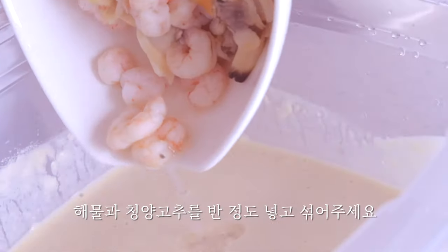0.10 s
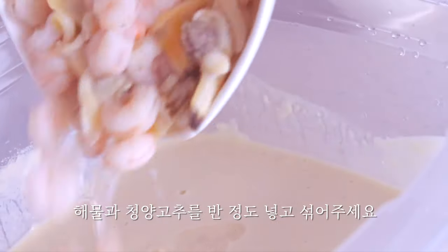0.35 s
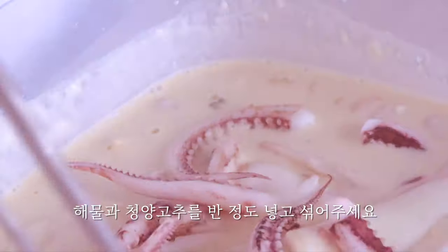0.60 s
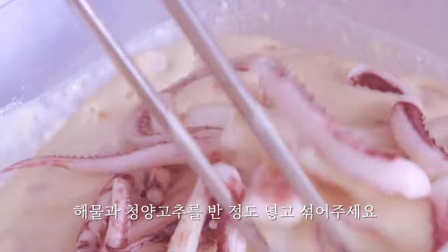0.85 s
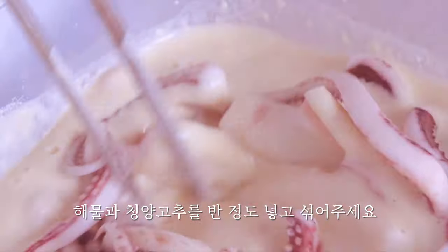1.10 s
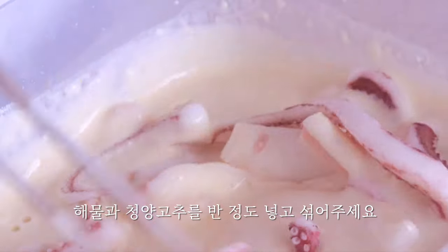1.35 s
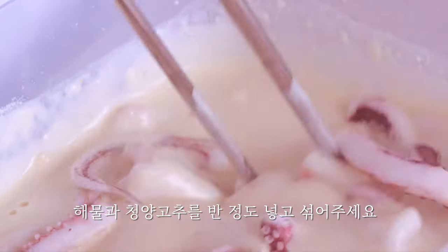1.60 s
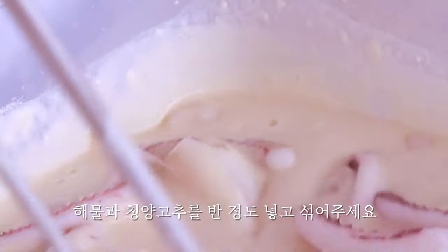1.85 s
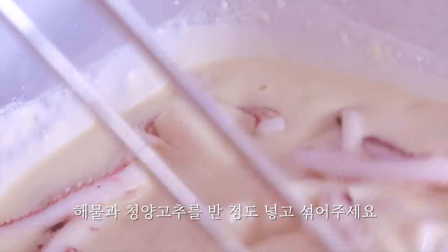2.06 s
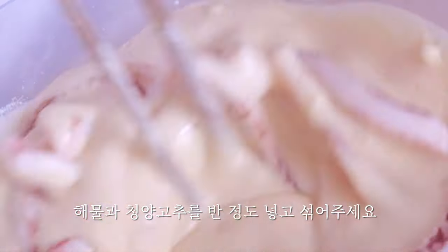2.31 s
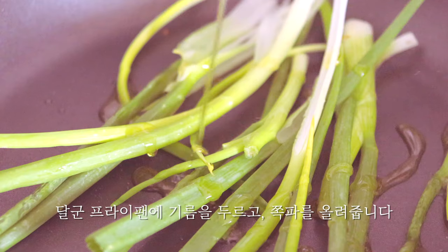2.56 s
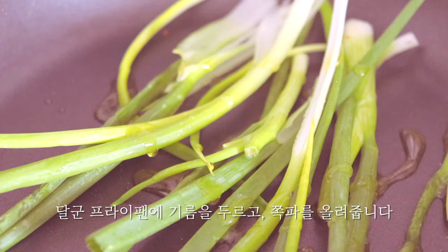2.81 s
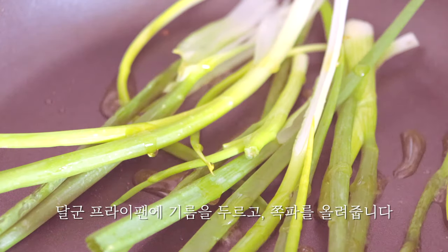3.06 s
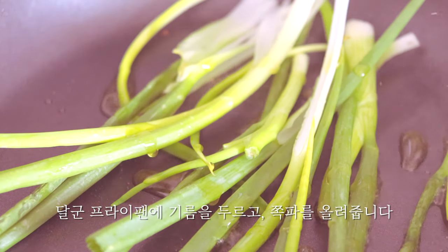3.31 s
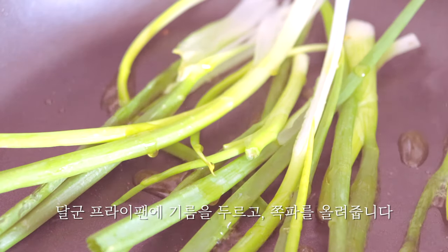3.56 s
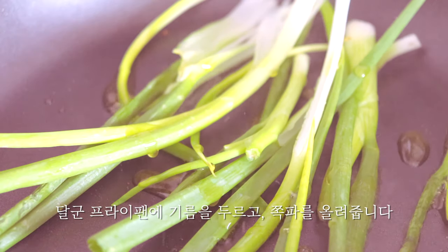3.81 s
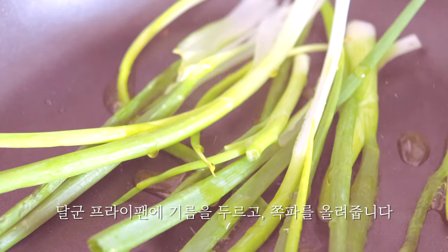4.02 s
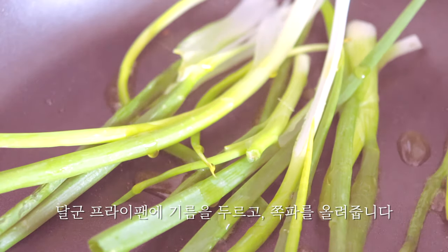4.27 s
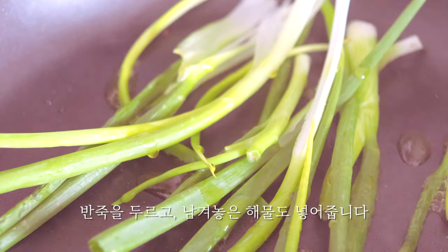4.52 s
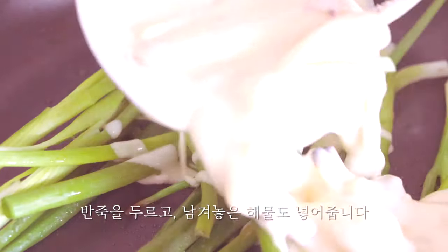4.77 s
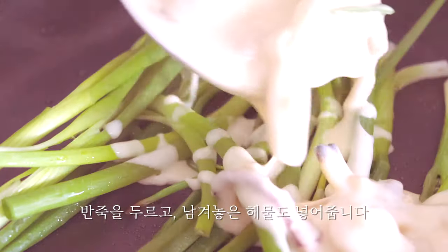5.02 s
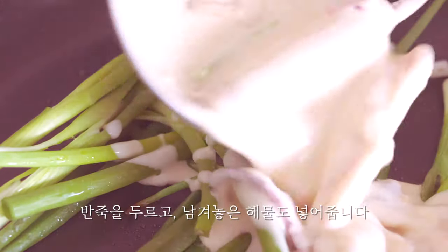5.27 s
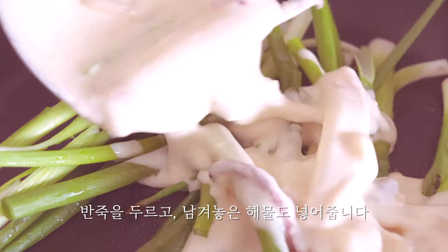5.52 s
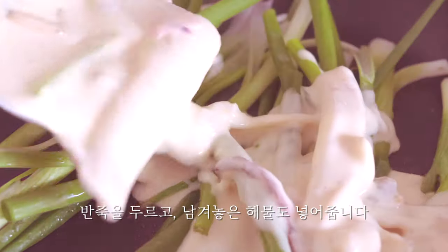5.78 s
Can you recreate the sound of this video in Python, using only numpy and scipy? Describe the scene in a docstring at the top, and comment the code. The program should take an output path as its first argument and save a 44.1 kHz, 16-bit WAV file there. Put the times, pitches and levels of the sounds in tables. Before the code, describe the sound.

The first half second is almost silent: soft room air and a couple of tiny wet ticks. At about 0.56 s a low, distant appliance rumble takes over. Metal utensils knock a batter bowl at 0.96 s, a short hollow clunk with a small room echo. Around 1.65 s a quick clatter strikes rim and dish, leaving a clear ring that is damped by 2.1 s, when a small click and soft counter thud follow. Faint wet batter ticks come at 2.2-2.4 s. At 2.6 s it cuts to close, bright oil sizzle, fluctuating and crackling, with sharp spits and droplets snapping against the microphone, mainly left; a strong burst lands at 3.09 s, others at 3.83 and 4.25 s. From 4.84 s batter covers the oil: the hiss becomes louder and steadier, with less rumble after 5 s, faint steam squeaks near 5 s and heavy pops around 5.16-5.4 s, sizzling to the end at about 5.9 s.

```python
"""A kitchen, starting in a quiet room with a few wet ticks; then the scene changes to steel tongs knocking a
bowl of batter over a low appliance rumble, and then to oil sizzling close up in a pan. Room and oil are shaped
noise; knocks are short blows with echoes and decaying modes. Spits are noise bursts; droplets strike the
microphone, mostly its left side, as snaps of pressure with a recoil. Later the pan sounds change: more hiss,
less rumble, thinner droplets."""
import sys
import numpy as np
from scipy import signal
from scipy.fft import rfft, irfft, next_fast_len
from scipy.io import wavfile
from scipy.ndimage import uniform_filter1d

SR = 44100
rng = np.random.default_rng(int(sys.argv[2]) if len(sys.argv) > 2 else 0)


def boost_factor(decibels):
    """Convert a level in decibels to a linear amplitude factor."""
    exponent = np.asarray(decibels, float) / 20
    return 10 ** exponent


def generate_wav(signal):
    """Clip the signal to [-1, 1] and save it as 16-bit WAV at the path in sys.argv[1]."""
    frames = np.transpose(np.atleast_2d(signal))
    scaled = np.clip(frames, -1, 1) * 32767
    pcm = np.round(scaled).astype(np.int16)
    wavfile.write(sys.argv[1], SR, pcm)


N = 259308  # length (samples)
STIR_S, FRY_S = 0.5585, 2.601  # the scene changes to the stirring, then to the frying (s)
COVERED_S = 4.84  # batter covers the oil and the hiss turns steady (s)
LATE_S = 5  # the pan sounds change: more hiss, less rumble, thinner droplets (s)


def paint(x, shape):
    """Filter by (hz, db) points, joined on a logarithmic frequency axis."""
    hz, db = np.transpose(shape)
    size = next_fast_len(x.shape[-1])
    f = np.arange(size // 2 + 1) * SR / size + 1  # 1 Hz up, to avoid log 0
    gain = boost_factor(np.interp(np.log(f), np.log(hz), db))
    return irfft(rfft(x, size) * gain, size)[..., :x.shape[-1]]


def level(x, db):
    """Scale to an rms level in dB of full scale."""
    return x * boost_factor(db) / np.sqrt(np.mean(x ** 2))


def band(x, lo_hz, hi_hz, order=2):
    """Causal band-pass."""
    sos = signal.butter(order, [lo_hz, min(hi_hz, 0.45 * SR)], "band", fs=SR, output="sos")
    return signal.sosfilt(sos, x)


def high_pass(x, cut_hz, order=2):
    """Causal high-pass."""
    return signal.sosfilt(signal.butter(order, cut_hz, "high", fs=SR, output="sos"), x)


def pan(db):
    """Left and right gains for a left minus right difference in dB."""
    return boost_factor(np.array([[db], [-db]]) / 2)


def walk(rate):
    """Random levels held 1 / rate s and slewed; spread near 1."""
    hold = int(SR / rate)
    steps = np.repeat(rng.standard_normal(N // hold + 1), hold)
    return 1.43 * uniform_filter1d(steps, hold)[:N]


def wide(noise, alike_hz):
    """Two sides made the same in the bass and unlike in the treble."""
    side = high_pass(noise[1], alike_hz)
    return noise[0] + side * np.array([[1], [-1]])


def add(out, s, sound):
    """Mix a sound in at a time."""
    i = int(s * SR)
    out[:, i:i + sound.shape[1]] += sound[:, :max(N - i, 0)]


# spectrum of the quiet room: pitch_hz, level_db (relative, per Hz)
QUIET_SHAPE = [(18, -44), (30, -15), (233, 0.5), (822, -11.5), (962, -14.5), (1160, -11), (1760, -23),
               (12600, -36), (16000, -38)]
# spectrum of the low appliance rumble: pitch_hz, level_db (relative, per Hz)
RUMBLE_SHAPE = [(18, -51), (30, -22.5), (189, -3), (355, -6.5), (394, -6.5), (801, -16.5), (913, -16),
                (1070, -17.5), (2230, -28), (5590, -35), (16000, -43)]
QUIET_DB, RUMBLE_DB = -75.5, -63  # rms before the flicker (dB of full scale)
ROOM_ALIKE_HZ = 945  # left and right agree below about this


def room_tone(shape, db, flicker_db):
    """Distant appliances and room air: shaped stereo noise, a little unsteady in level."""
    air = paint(wide(rng.standard_normal((2, N)), ROOM_ALIKE_HZ), shape)
    return level(air, db) * boost_factor(flicker_db * walk(11.62))


# reverberation of the kitchen: pitch_hz, t60_s
ROOM_T60 = [(150, 0.43), (500, 0.3), (1400, 0.35), (3000, 0.22), (6000, 0.043), (12000, 0.48)]


def kitchen(patchy_db=4):
    """Echo tail from one spot: half-octave bands of noise dying unevenly at their own rates."""
    t = np.arange(SR // 3) / SR
    knots = t[::SR // 60]
    hz, t60 = np.transpose(ROOM_T60)
    tail = 0
    for f in 60 * 2 ** np.arange(0, 8.5, 0.5):
        noise = band(wide(rng.standard_normal((2, len(t))), 1000), f / 2 ** 0.14, f * 2 ** 0.32, order=1)
        patchy = patchy_db * np.interp(t, knots, rng.standard_normal(len(knots)))
        decay = 60 * t / np.interp(np.log(f), np.log(hz), t60)
        tail = tail + noise * boost_factor(patchy - decay)
    # the counter and nearby things answer first and strongest
    return tail * np.clip(t / 0.001, 0, 1) * (1 + 1.83 * np.exp(-t / 0.0047))


# tongs and dishes knocked: start_s, peak_db, lowest_hz, highest_hz, left_minus_right_db
KNOCK_LIST = [(0.956, -15.5, 350, 2120, -4.5), (1.645, -38, 500, 1410, -7), (1.6483, -26, 593, 1520, 5),
              (1.6535, -18, 450, 2830, -7), (1.8103, -36.5, 467, 1830, -6), (2.1194, -34, 1200, 5150, -5),
              (2.124, -37, 149, 1100, 4)]
# wet ticks of batter and drips: start_s, peak_db, centre_hz, left_minus_right_db
TICK_LIST = [(.2064, -69, 5750, 1), (0.2424, -59, 4300, -3), (0.5281, -52.5, 3500, -3),
             (0.7226, -57, 4500, 0), (1.4651, -58, 4200, -4), (2.2165, -58, 6800, 0),
             (2.2726, -47, 2140, 2.5), (2.416, -45.5, 3050, 1)]
TICK_SPAN = 2  # a tick's band edges lie this factor below and above its centre
KNOCK_ECHO_DB, TICK_ECHO_DB = -29.5, -35.5  # gain of the echo tail (dB)


def knocks():
    """Each contact is a band-limited blow heard direct and through the kitchen's echo."""
    out = np.zeros((2, N))
    click = np.eye(1, 2000)[0]
    tick_tail = kitchen()  # the ticks all come from one spot
    contacts = [(*row, KNOCK_ECHO_DB, kitchen()) for row in KNOCK_LIST]
    contacts += [(s, db, hz / TICK_SPAN, hz * TICK_SPAN, pan_db, TICK_ECHO_DB, tick_tail)
                 for s, db, hz, pan_db in TICK_LIST]
    for s, db, lo_hz, hi_hz, pan_db, echo_db, tail in contacts:
        # a soft contact falls off steeply in the treble, gently in the bass
        blow = band(click, lo_hz, 2 * hi_hz, order=1)
        blow = signal.sosfilt(signal.butter(4, hi_hz, fs=SR, output="sos"), blow)
        blow = blow[None] * boost_factor(db) / abs(blow).max()
        add(out, s, pan(pan_db) * blow)
        add(out, s, pan(pan_db / 2) * boost_factor(echo_db) * signal.fftconvolve(tail, blow, axes=1))
    return out


def ring(hit, modes, waver_db=2.5):
    """Decaying modes of a struck object until a touch damps it; echoes make each mode waver."""
    start, stop, hit_db, bloom_ms = hit
    t = np.arange(int((stop - start) * SR)) / SR
    knots = t[::SR // 40]
    phases = rng.uniform(-0.84, 0.8, (len(modes), 2, 1))  # each side hears its own phase
    tone = 0
    for (hz, db, t60), phase in zip(modes, phases):
        waver = waver_db * np.interp(t, knots, rng.standard_normal(len(knots)))
        wave = np.sin(2 * np.pi * hz * t + phase * min(hz / 900, 1.3))
        tone = tone + boost_factor(db + waver - 60 * t / t60) * wave
    bloom = np.clip(1000 * t / bloom_ms, 0, 1)  # a bloom below zero keeps the object silent
    damping = np.clip((stop - start - t) / 0.017, 0, 1)
    return boost_factor(hit_db) * tone * bloom * damping


# one blow on an object: start_s, damped_s, level_db, bloom_ms (the bowl's is below zero: silent)
BOWL_BLOW = (0.958, 1.5, -36, -0.5)
DISH_BLOW = (1.6542, 2.112, -36, 48)
DISH_TOP_BLOW = (1.653, 2.112, -36, 4)
RIM_BLOW = (1.6535, 2.1, -35.5, 0.5)
TIP_BLOW = (2.1195, 2.2, -30, .6)
# several blows, one per row: start_s, damped_s, level_db, bloom_ms
TONGS_BLOWS = [(0.954, 1.5, -60, 2), (1.65, 2.1, -61, 1.8)]
COUNTER_BLOWS = [(.958, 1.3, -46.5, 6.6), (1.656, 2.0, -45.5, 4.5), (2.122, 2.5, -43.5, 4.3),
                 (4.138, 4.29, -49, 8), (4.163, 4.29, -59, 10), (4.297, 4.5, -52, 8.7),
                 (4.325, 4.5, -54.5, 11)]
# modes of each object: pitch_hz, level_db (added to the blow's), t60_s
BOWL_MODES = [(360, -8, 0.39), (437, -6, 0.24), (551, -2.5, 0.15), (686, -7, 0.22), (768, -3, 0.28),
              (838, 5, 0.13), (914, -2, .22), (1195, -9, .2), (1435, -7, 0.3), (1610, -6, 0.26),
              (1670, -14, .55), (1930, -3, .1), (2202, -9, 0.19), (2960, -22, .17)]
DISH_MODES = [(1620, -14, .8), (1696, -1, .72)]
DISH_TOP_MODES = [(3187, -6, .52), (3408, -9, .44), (5570, -33, .3)]
RIM_MODES = [(356, -8.5, 0.33), (634, -11, 0.26), (844, -9, 0.27), (970, 5.5, 0.13), (1117, -10, .3),
             (1464, -3.5, .2), (1916, -4, 0.11), (2040, -5, 0.15), (2220, -7, .15), (2370, -3, 0.097)]
TIP_MODES = [(1500, -6, .02), (2120, -1, 0.013), (2850, 0, 0.012), (3600, -5, .009), (4500, -3, 0.008)]
TONGS_MODES = [(10300, -2.5, 0.15), (11780, -6, 0.16), (11800, -15, 0.25), (14400, -2.5, .12)]
COUNTER_MODES = [(69.6, -10, 0.11), (153.4, -3, 0.23), (192.7, -9, 0.28), (373, -1, 0.12), (813, -5.5, .08),
                 (934, -4, 0.084)]


def struck():
    """Tongs, dishes and counter set ringing: a sum of damped modes for every blow."""
    out = np.zeros((2, N))
    hits = [(BOWL_BLOW, BOWL_MODES), (DISH_BLOW, DISH_MODES), (DISH_TOP_BLOW, DISH_TOP_MODES),
            (RIM_BLOW, RIM_MODES), (TIP_BLOW, TIP_MODES)]
    hits += [(hit, TONGS_MODES) for hit in TONGS_BLOWS]
    hits += [(hit, COUNTER_MODES) for hit in COUNTER_BLOWS]
    for hit, modes in hits:
        add(out, hit[0], ring(hit, modes))
    return out


# steam squeezing out through a gap: start_s, lasts_s, from_hz, to_hz, level_db (before the chopping)
SQUEAL_LIST = [(2.692, .03, 2500, 1000, -47.5), (4.912, 0.028, 2500, 3200, -50),
               (4.998, .035, 3400, 3000, -53), (5.035, .11, 3100, 2850, -54)]


def squeals(wobble=0.02, chop_db=3, breath=0.75):
    """Faint breathy whistles that glide and waver, chopped as the bubbles pass."""
    out = np.zeros((2, N))
    for s, lasts, from_hz, to_hz, db in SQUEAL_LIST:
        part = np.arange(0, 1, 1 / (lasts * SR))
        count = len(part)
        hz = (from_hz + (to_hz - from_hz) * part) * (1 + wobble * walk(307)[:count])
        tone = np.sin(2 * np.pi * np.cumsum(hz) / SR) * np.sin(np.pi * part ** 0.67)
        sputter = walk(abs(from_hz - to_hz))[:count]  # a wider glide sputters faster
        tone = tone * (1 - breath + breath * sputter)
        add(out, s, np.ones((2, 1)) * tone * boost_factor(db + chop_db * walk(255)[:count]))
    return out


# how hard the oil boils: time_s, vigour_db
BOIL_CURVE = [(2.6, 2.5), (2.68, -2.5), (2.9, -0.5), (3.08, -0.5), (3.2, -2), (3.55, 0), (3.8, 0.5),
              (4.05, 1), (4.3, 1.5), (4.58, 1), (4.65, -1.5), (4.75, 1.5), (4.82, 0.5), (4.845, 3),
              (5.12, 4), (5.3, 3), (5.5, 2.5), (5.88, 3)]


def boil(t):
    """Vigour of the frying in dB, read between the listed times."""
    return np.interp(t, *np.transpose(BOIL_CURVE))


def bubbles(rate=500, centre_hz=3200, cycles=2.65, size_db=-60, spread_db=3.0, wet_db=2.5):
    """Larger steam bubbles sing for a few cycles; stronger after LATE_S."""
    out, t = np.zeros((2, N)), np.arange(400) / SR
    chance = rng.random((int(rate * (N / SR - FRY_S)), 4))
    when, pitch, size, side = chance.T[..., None]
    at = FRY_S + when * (N / SR - FRY_S)
    hz = centre_hz * 2 ** (1.07 * (pitch - 0.5))
    db = size_db + 1.5 * boil(at) + wet_db * (at > LATE_S)
    db = db - spread_db * np.log(np.maximum(size, 0.04))
    songs = boost_factor(db) * np.sin(2 * np.pi * hz * t) * np.exp(-t * hz / cycles)
    for s, song, place in zip(at[:, 0], songs, side[:, 0]):
        add(out, s, pan(12 * (place - 0.5)) * song)
    return band(out, 1200, 9000)


# bright spits of oil: start_s, crack_db (peak), left_minus_right_db, centre_hz, spray_db (against crack)
SPIT_LIST = [(2.604, -27.5, -2, 8810, -12), (2.6205, -32, 2, 6190, -21), (2.7322, -34, -15, 12000, -8),
             (2.7527, -23, -7.5, 6500, -13), (2.78, -32, -10, 4930, -20), (2.803, -32, -5, 13500, -19),
             (2.872, -34, -1, 1800, -13), (3.068, -30, -2, 3300, -7), (3.0847, -22.5, -13.5, 11500, -2),
             (3.276, -29, 13.5, 4660, -13), (3.4865, -32, -3, 3500, -6), (3.6864, -32, 1, 11410, -6),
             (3.747, -27.5, -8, 11200, -6), (3.8292, -27, 3, 4670, -25), (3.921, -28, 7, 5950, -10.5),
             (4.1455, -31.5, -2, 2200, -5), (4.205, -31, 0, 3300, -9), (4.22, -33, -2, 2500, -8),
             (4.2355, -34, -2, 2500, -12), (4.251, -21.5, -9, 7530, -18), (4.3703, -28, -21, 11900, -9),
             (4.4067, -24, -11, 12700, -11), (4.493, -30, -1.0, 9470, -17), (4.53, -29.5, 0, 3500, -14),
             (4.5445, -31.5, 0, 5000, -12), (4.68, -31, 0, 9020, 0), (4.6966, -30, -9, 9000, -9),
             (4.7035, -30.5, 0, 9000, -6), (4.7345, -23.5, -5, 12600, -2), (4.764, -32.5, 0, 1500, -5),
             (4.8395, -23.5, -5, 3300, -9), (4.8524, -25, 1, 7990, -6), (4.968, -30, 0, 9000, -11),
             (5.002, -28, 2, 3994, -12), (5.3732, -28.5, 8, 4670, -8), (5.5824, -26, 0, 11500, -9),
             (5.614, -26.5, -1.0, 14000, -3), (5.7314, -25.5, -1.5, 14800, -2)]
SPRAY_MS, SPRAY_GROWTH = 2.9, 145  # spray decay (ms); a stronger one lasts longer (ms per full scale)


def spits(rate=135, small_db=-42, spread_db=2.0):
    """A sharp crack, then a spray of fine droplets, as band-passed noise; lesser spits come by chance."""
    out, t = np.zeros((2, N)), np.arange(2000) / SR
    loose = []
    for when, size, side, pitch in rng.random((int(rate * (N / SR - FRY_S)), 4)):
        s = FRY_S + when * (N / SR - FRY_S)
        db = small_db + boil(s) - 4 * (s > COVERED_S) - spread_db * np.log(max(size, 0.08))
        loose.append((s, db, 16 * (side - 0.5), 1700 * 5 ** pitch, -12))
    for s, db, pan_db, hz, spray_db in list(SPIT_LIST) + loose:
        noise = rng.standard_normal((2, len(t)))
        spray_ms = SPRAY_MS + SPRAY_GROWTH * boost_factor(db + spray_db)
        shape = np.exp(-t / 0.00016) + boost_factor(spray_db) * np.exp(-1000 * t / spray_ms)
        spit = band((0.6 * noise[0] + noise) * shape, hz / 2.23, hz * 2.5)
        add(out, s + 0.001, boost_factor(db) * pan(pan_db) * spit / abs(spit).max())  # 1 ms after its start_s
    return out


# Pushes below are signed shares of full scale, before recoil and bass cuts.
# droplets on the microphone: start_s, left_push, right_push
DROP_LIST = [(2.7533, -0.0098, -0.017), (3.0859, -0.16, -0.14), (3.1062, 0.039, 0.018),
             (3.1993, 0.016, 0.034), (3.2388, 0.026, 0.026), (3.275, 0.092, 0.1), (3.3469, 0.031, -0.009),
             (3.4249, 0.058, 0.0094), (3.4283, 0.037, -0.00075), (3.4675, .069, -0.0044),
             (3.614, 0.035, -0.0033), (3.6819, 0.056, -0.0019), (3.7322, 0.05, -0.0065),
             (3.8302, 0.23, 0.034), (3.8334, 0.087, -0.034), (3.9222, 0.076, -0.0031),
             (3.9737, 0.055, 0.0034), (4.1024, 0.048, -0.0081), (4.162, 0.04, -0.0043), (4.252, 0.1, 0.025),
             (4.256, 0.072, -0.0064), (4.3615, 0.053, 0), (4.368, 0.072, -0.0084), (4.4079, .04, 0.0031),
             (4.4435, 0.036, -0.0082), (4.4933, 0.045, 0.0097), (4.5757, 0.046, -0.0054),
             (4.5812, .04, 0.0017), (4.6807, 0.037, -0.0087), (4.7355, 0.038, 0.0061),
             (4.8703, 0.051, -0.011), (4.9002, 0.093, -0.0031), (5.0033, 0.034, -0.0049),
             (5.0732, 0.039, -0.0027), (5.156, -0.2, -0.012), (5.1622, 0.085, -0.011),
             (5.1713, 0.067, -0.014), (5.178, 0.029, 0), (5.205, .04, 0), (5.292, 0.026, -0.003),
             (5.3088, 0.049, 0.013), (5.3749, -0.16, -0.027), (5.4441, -0.055, 0.0012),
             (5.5844, -0.031, -0.0051), (5.6155, -0.094, 0.02), (5.7374, 0.088, 0.011)]
# a big soft splat of batter on the microphone: start_s, left_push, right_push, snap_ms
SPLAT_LIST = [(5.2168, .19, .017, 0.12)]
# air shoved at the membrane by the biggest bursts: start_s, left_push, right_push
SHOVE_LIST = [(3.0858, -0.25, -0.18), (3.275, 0.017, 0.075), (3.83, -0.078, 0.033), (4.251, 0.016, 0.0016),
              (5.156, -0.13, 0.005), (5.2171, -0.014, -0.012)]
# spells of small droplets: from_s, to_s, rate_per_s, size (share of full scale, scaled by chance)
SPATTER_SPELLS = [(2.6, 3.08, 24, 0.003), (3.1, 4.619, 98, 0.008), (4.619, 5.25, 85, 0.006),
                  (5.251, 5.879, 62, 0.0044)]
SNAP_MS, RECOIL_MS, RECOIL_SHARE = 0.064, 0.54, 0.73  # times to the peak; recoil's share of the snap's area scale
THUMP_MS, THUMP_GROWTH = 0.31, 1.35  # a shove bigger on the left lasts longer (ms per full scale)
LATE_DROP_CUT_HZ, MIC_CUT_HZ = 170, 52  # bass cuts: droplets after LATE_S; everything here


def drops():
    """A short snap of pressure and its recoil; many small ones fall by chance, mostly on the left."""
    out, ms = np.zeros((2, N)), np.arange(600) * 1000 / SR

    def push(peak_ms):
        return ms / peak_ms * np.exp(1 - ms / peak_ms)

    def snap(peak_ms):
        return push(peak_ms) - RECOIL_SHARE * peak_ms / RECOIL_MS * push(RECOIL_MS)

    loose = []
    for start, end, rate, small in SPATTER_SPELLS:
        for when, size, right in rng.random((int(rate * (end - start)), 3)):
            left_push = small * (0.3 - 0.89 * np.log(max(size, 0.12)))
            loose.append((start + when * (end - start), left_push, small * right ** 2))
    for s, *sides in list(DROP_LIST) + loose:
        add(out, s, np.outer(sides, snap(SNAP_MS)))
    for s, *sides, snap_ms in SPLAT_LIST:
        add(out, s, np.outer(sides, snap(snap_ms)))
    late = int(LATE_S * SR)
    out[:, late:] = high_pass(out[:, late:], LATE_DROP_CUT_HZ)
    for s, *sides in SHOVE_LIST:
        add(out, s, np.outer(sides, push(THUMP_MS + THUMP_GROWTH * abs(sides[0]))))
    return high_pass(out, MIC_CUT_HZ, order=3)


def split(x, edges_hz):
    """Overlapping bands that add up to the input."""
    octave = np.log2(np.arange(N // 2 + 1) * SR / N + 1)
    above = [np.clip(octave - np.log2(hz) + 0.5, 0, 1) for hz in edges_hz]
    spectrum = rfft(x)
    return [irfft(spectrum * (hi - lo), N) for hi, lo in zip([1] + above, above + [0])]


# spectrum of the oil before its bands are levelled: pitch_hz, level_db (relative, per Hz)
SIZZLE_SHAPE = [(35, -38), (60, -13), (136, -2), (420, -2), (720, -17), (1050, -6.5), (1400, -6.5),
                (1900, -8), (3200, -2), (4800, -3.5), (7200, -3), (11000, -0.5), (16300, 0)]
# borders between the rumble, low, middle and high sizzle: edge_hz
BAND_EDGES = [502, 2520, 8640]
# each band's rms at a plain boil, before the swings and pan: level_db
BAND_LEVELS = [-74.5, -64.5, -52, -47.5]
# how each band follows the boil: gain_db per dB of boil
BAND_FOLLOWS = [0.76, 1.56, 1.45, 1.13]
# each band's change from LATE_S on: change_db
BAND_LATE = [-15, 3, 0.04, 0.1]


def sizzle(rate=2500, spread_db=2.0, crackle_db=0.5, flicker_db=1.4):
    """Countless steam bubbles merge to hiss; the nearer ones stand out as ticks of very uneven size."""
    burst = rng.random(N) < rate / SR * boost_factor(3 * walk(60))  # ticks come in flurries
    size_db = spread_db * np.minimum(rng.exponential(size=N), 5)
    ticks = level(burst * boost_factor(size_db) * rng.standard_normal((2, N)), crackle_db)
    steam = paint(wide(ticks + rng.standard_normal((2, N)), 460), SIZZLE_SHAPE)
    t, surge = np.arange(N) / SR, walk(18)  # all bands share the surge
    lively = np.where(t > COVERED_S, 0.4, 1)
    out = 0
    bands = zip(split(steam, BAND_EDGES), BAND_LEVELS, BAND_FOLLOWS, BAND_LATE)
    for part, db, follows, late_db in bands:
        swing_db = lively * (0.8 * surge + flicker_db * walk(30))
        change_db = follows * boil(t) + late_db * (t > LATE_S) + swing_db
        out = out + level(part, db) * boost_factor(change_db)
    return pan(-1.2) * out


def scene():
    """Room, stirring and frying follow each other with short fades; struck objects ring across them."""
    t = np.arange(N) / SR
    stirring, frying = (np.clip((t - s) / 0.0012, 0, 1) for s in (STIR_S, FRY_S))
    quiet = (1 - stirring) * room_tone(QUIET_SHAPE, QUIET_DB, 1.0)
    rumble = stirring * room_tone(RUMBLE_SHAPE, RUMBLE_DB, 1.3)
    before = (1 - frying) * (quiet + rumble + knocks())
    pan_sounds = squeals() + bubbles() + spits() + drops() + sizzle()
    return before + struck() + frying * pan_sounds


def band_limit(x):
    """A steep low-pass at the top of the band."""
    return signal.sosfilt(signal.butter(12, 16860, fs=SR, output="sos"), x)


def record(dry):
    """A steep low-pass takes off the top of the treble."""
    top_hz = 16050
    mix = signal.sosfilt(signal.ellip(8, 0.2, 30, top_hz, fs=SR, output="sos"), dry)
    return band_limit(mix)


dry = scene()
out = record(dry)
generate_wav(out)
```